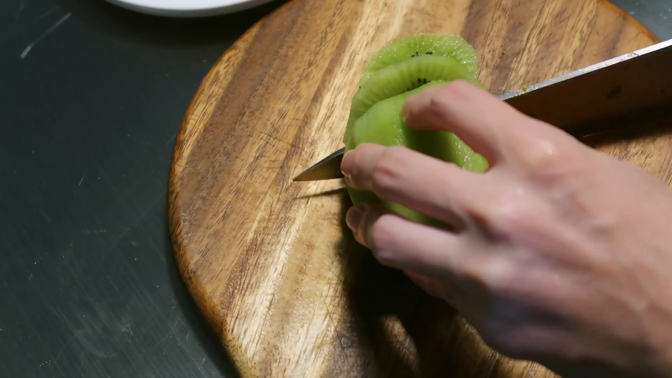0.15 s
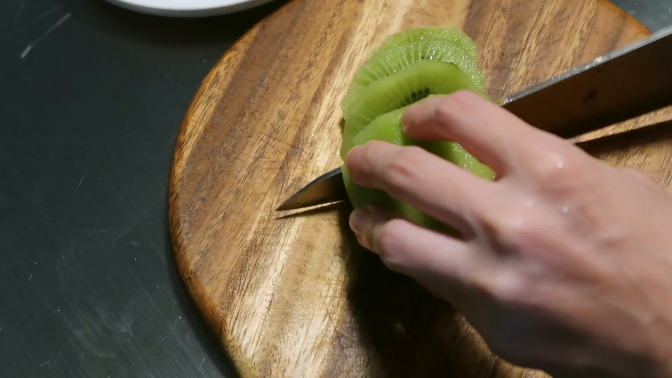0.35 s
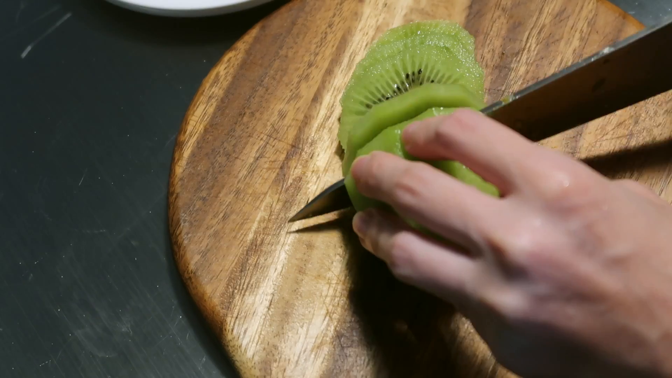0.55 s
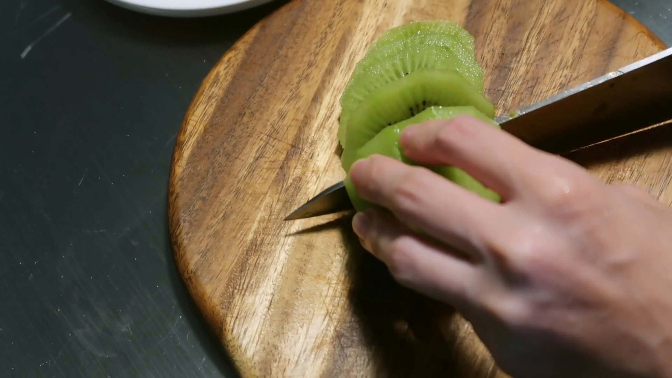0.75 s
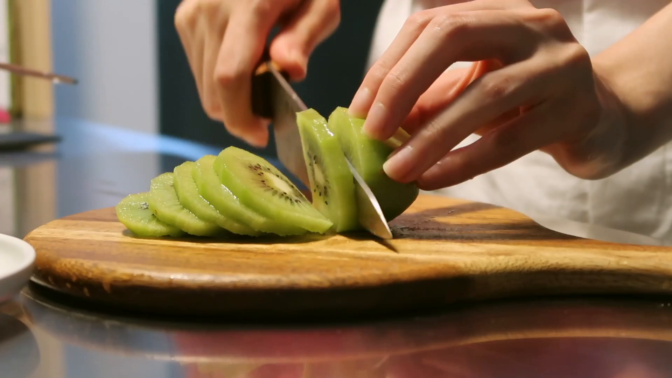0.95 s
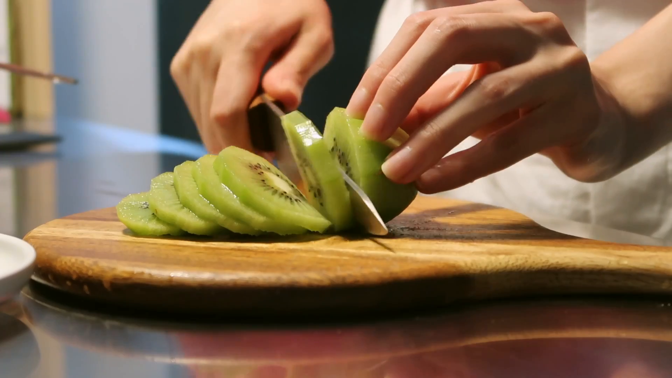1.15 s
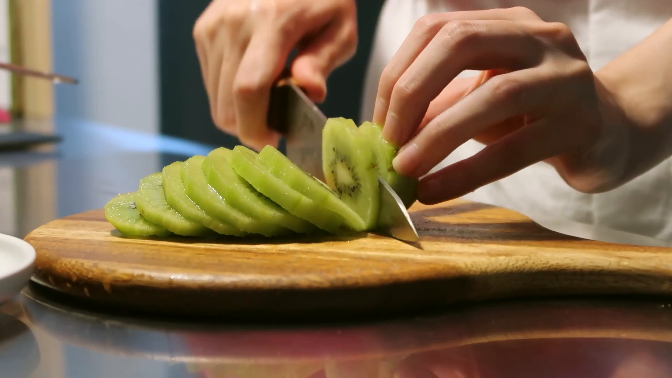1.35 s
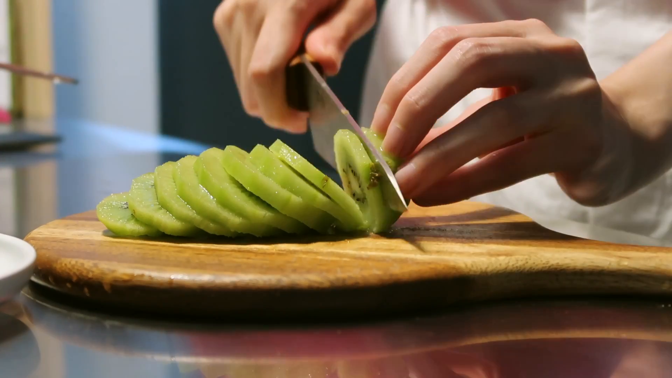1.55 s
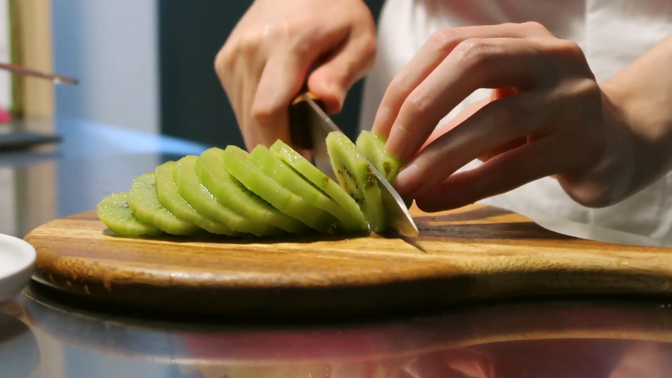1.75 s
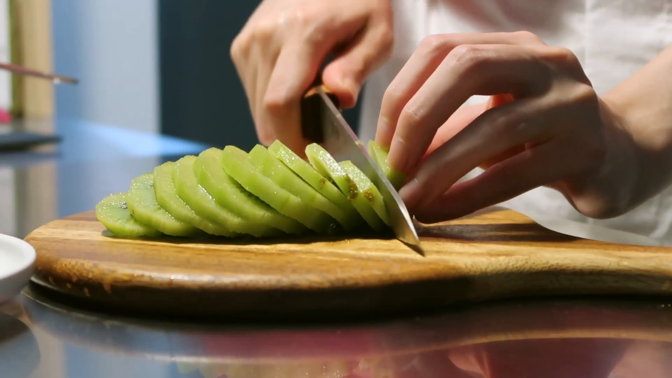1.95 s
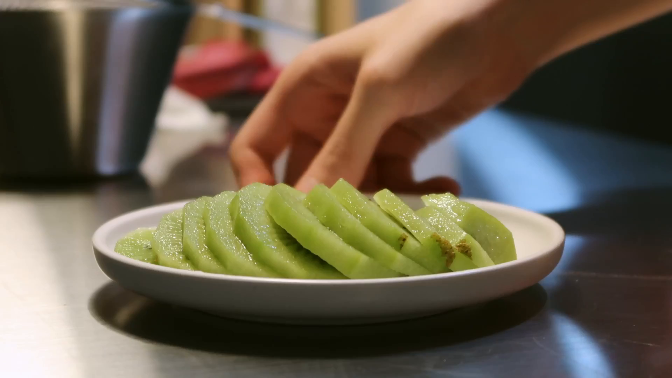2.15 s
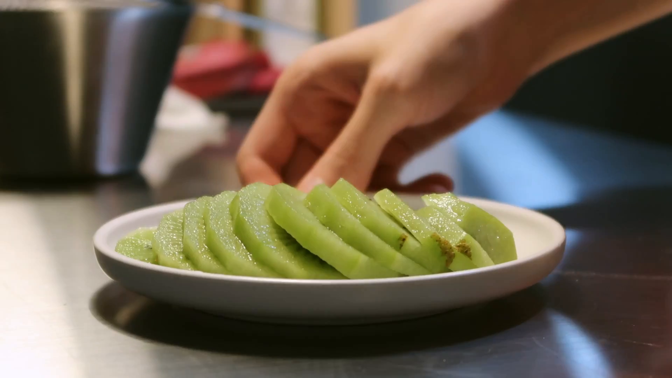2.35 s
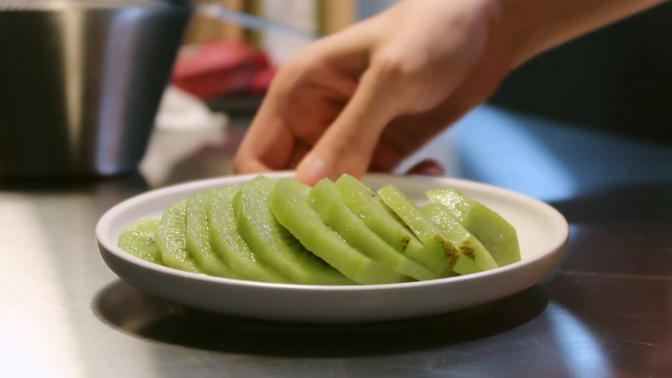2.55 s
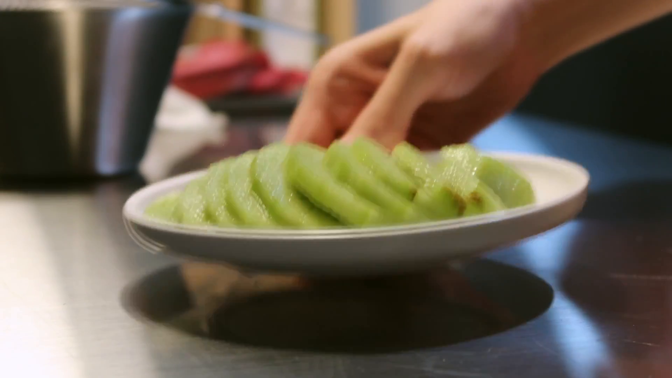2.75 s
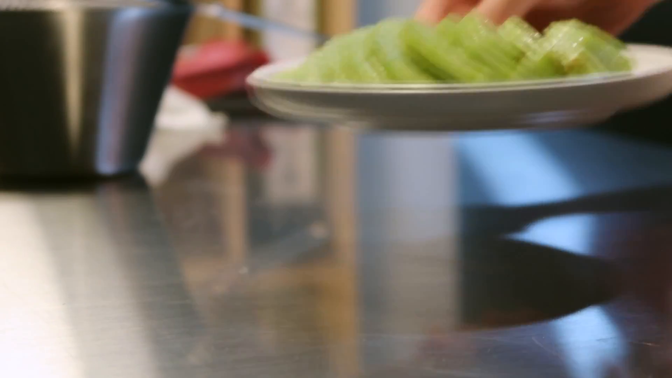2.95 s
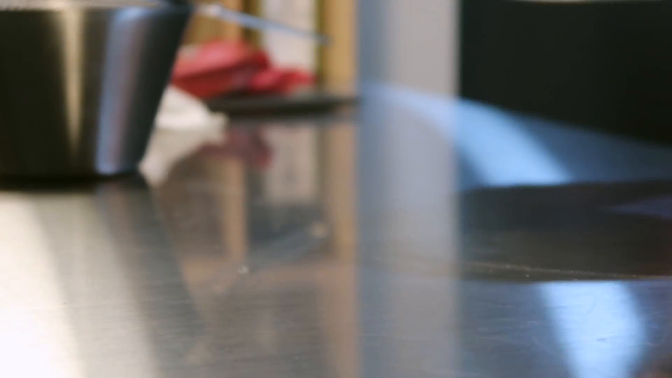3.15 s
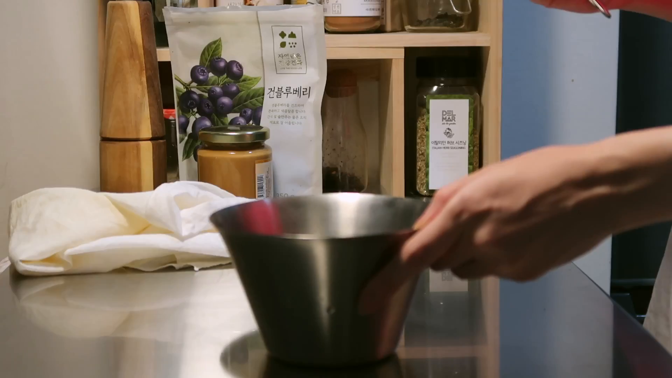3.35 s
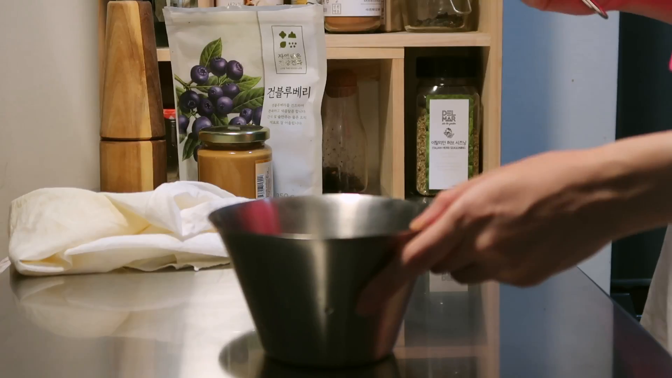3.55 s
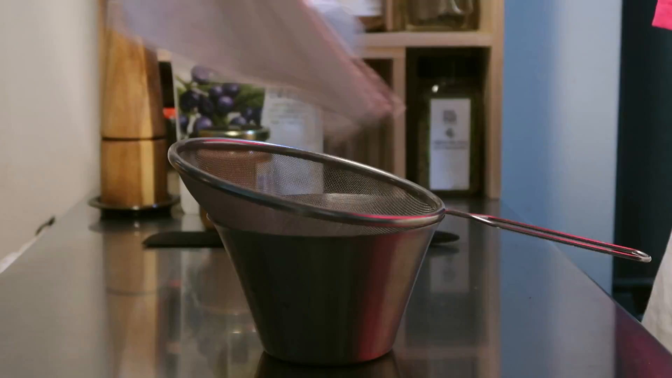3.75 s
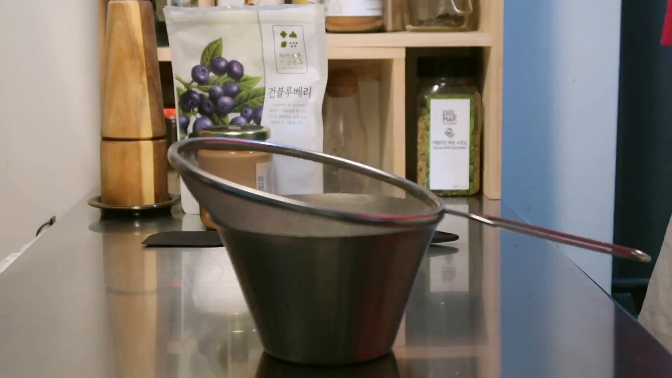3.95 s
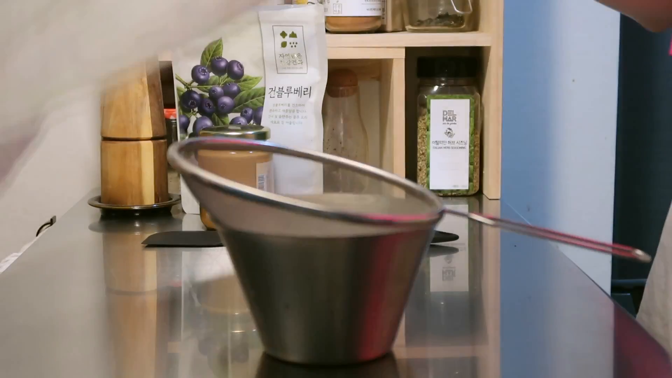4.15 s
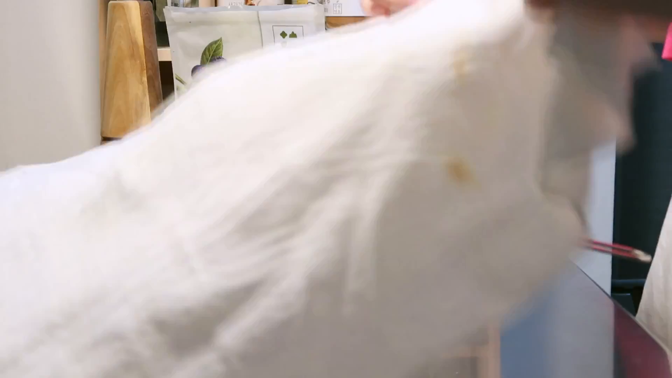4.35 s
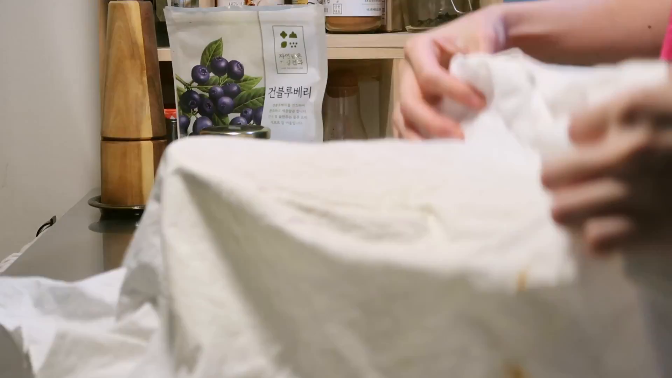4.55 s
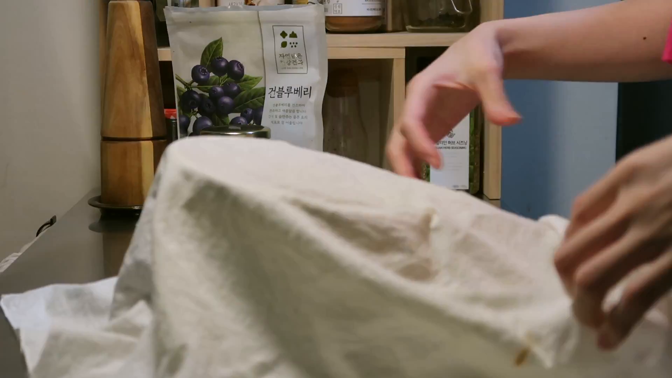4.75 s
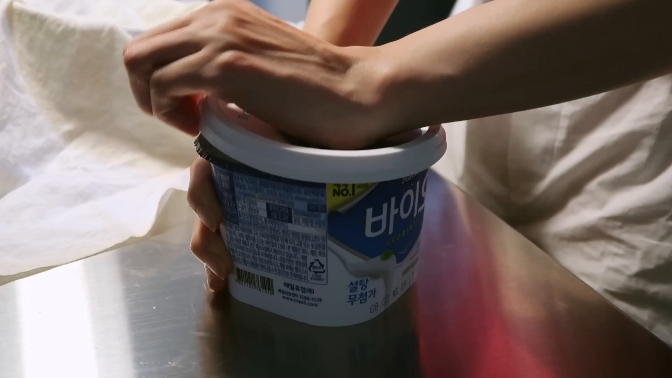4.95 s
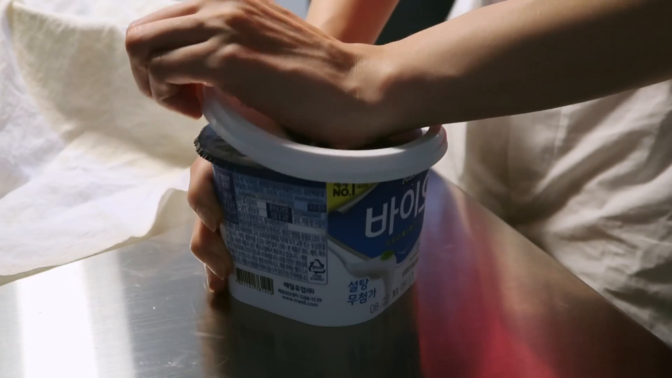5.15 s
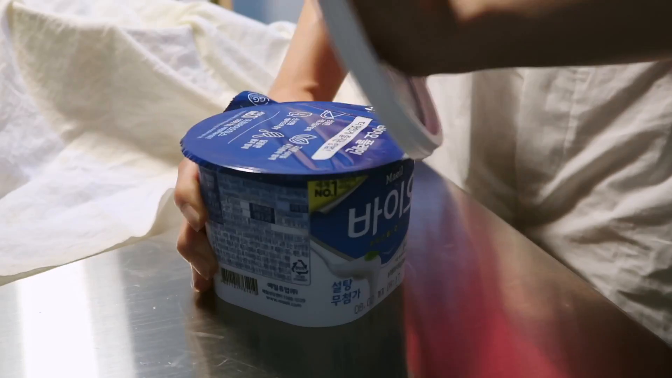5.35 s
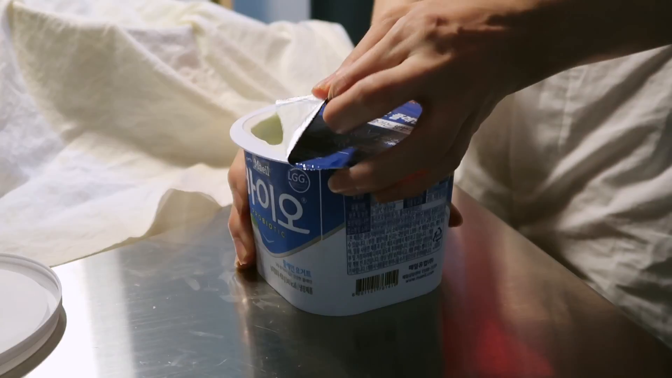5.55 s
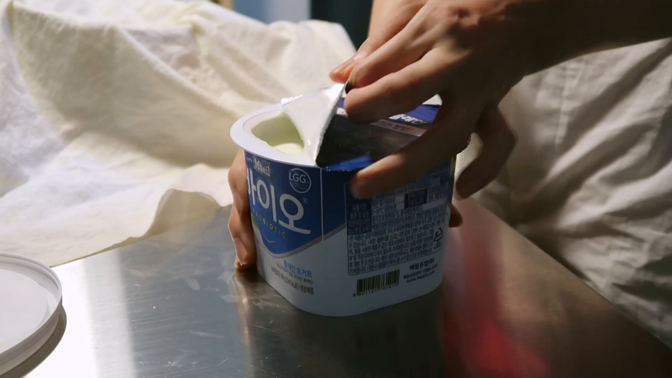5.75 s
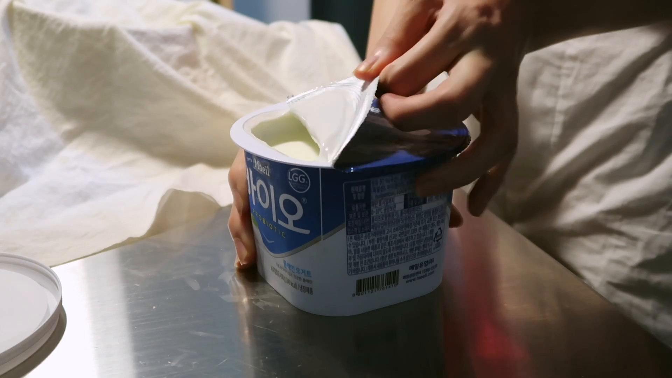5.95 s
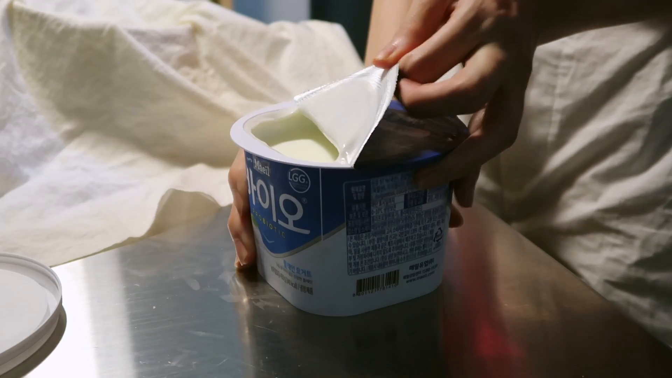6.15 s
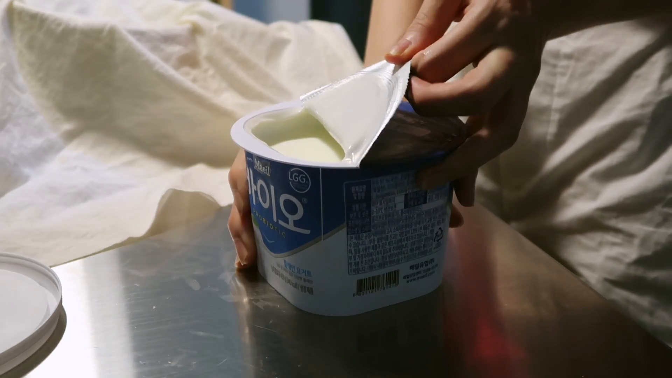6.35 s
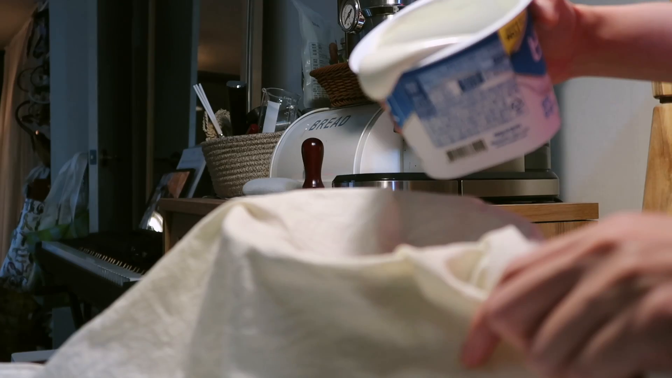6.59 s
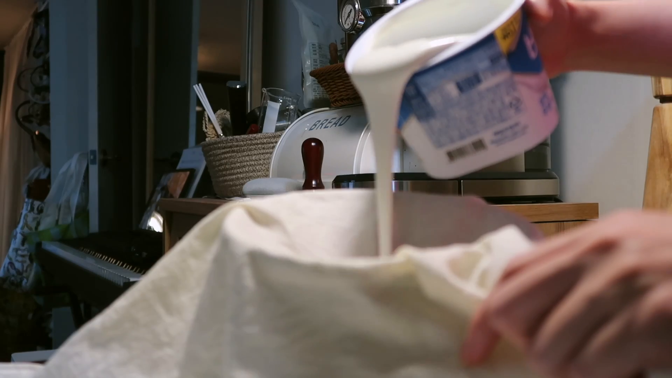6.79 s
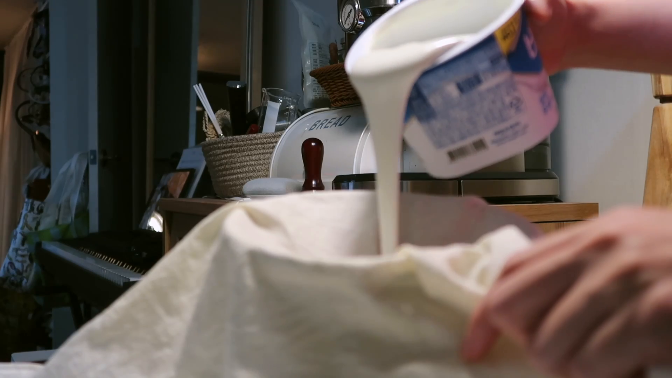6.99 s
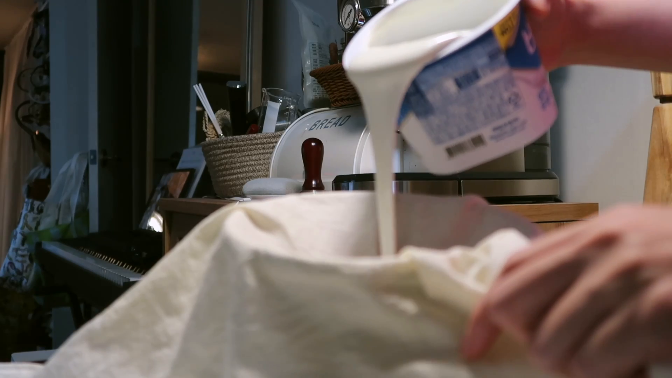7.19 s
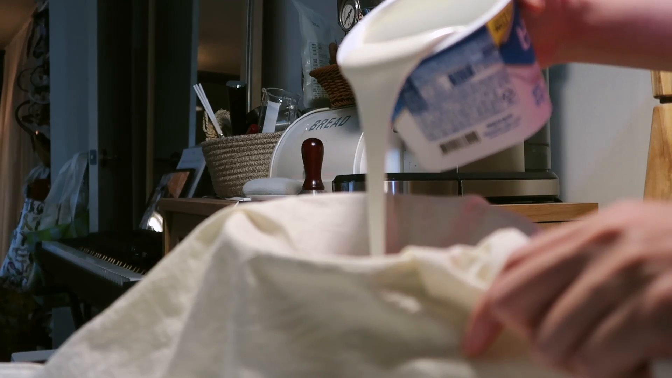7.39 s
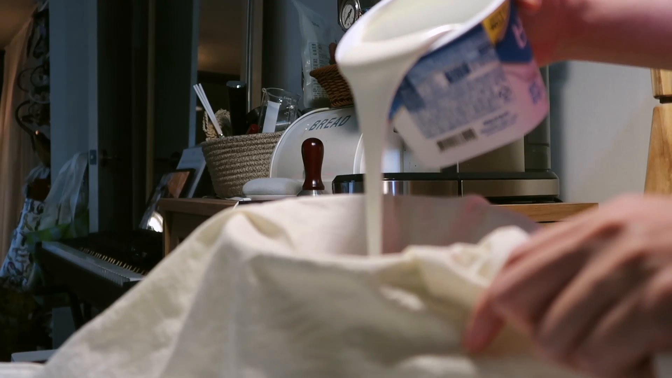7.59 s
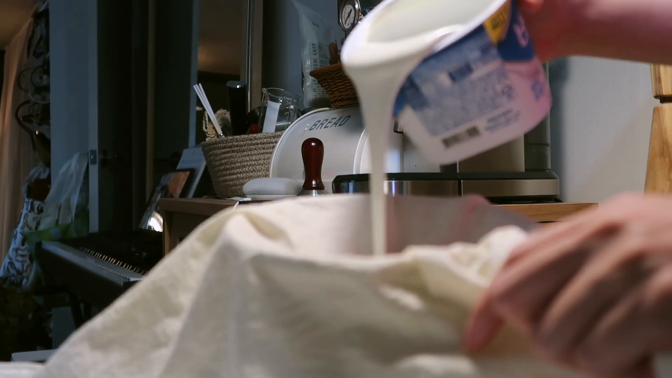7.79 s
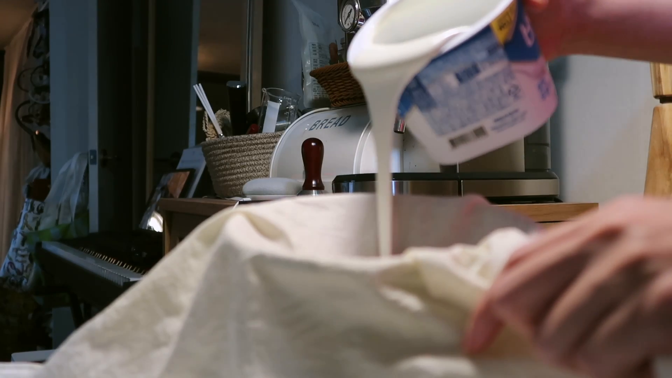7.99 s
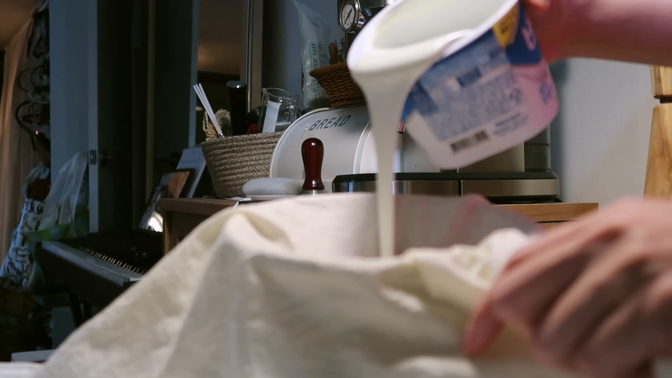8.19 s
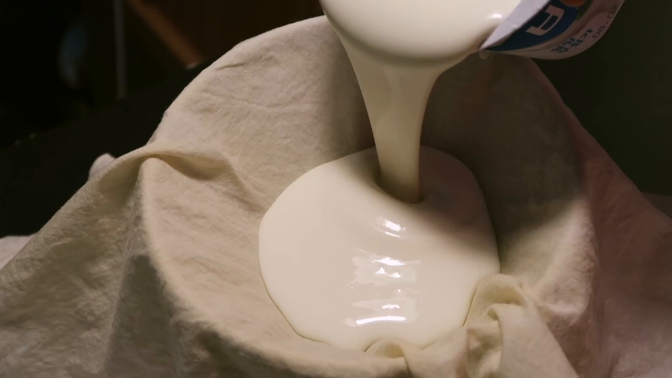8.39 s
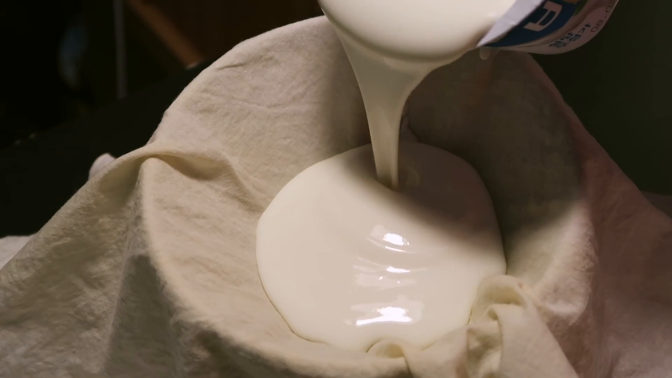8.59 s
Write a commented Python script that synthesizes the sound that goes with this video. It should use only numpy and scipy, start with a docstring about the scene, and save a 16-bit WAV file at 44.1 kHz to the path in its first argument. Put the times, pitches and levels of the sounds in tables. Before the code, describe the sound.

Close kitchen handling: seven wet cuts onto wood, a faint plate knock, a metal bowl landing, tub lid popping, foil seal peeling, then only hum-free room tone.

```python
"""A knife slices a kiwi and knocks on a wooden board, close to the microphone in a small, quiet kitchen.
Then a plate knocks and drags, a steel bowl lands, a plastic lid snaps off a tub and its foil seal peels in jerks.
Contacts are coloured clicks with ringing modes; fizz, drags and crackle are shaped noise, all with echoes.
Filtered noise makes the room air and appliance hums; the handling stops dead at 6.47 s and another air follows."""
import sys
import numpy as np
from scipy import signal
from scipy.fft import rfft, irfft, next_fast_len
from scipy.io import wavfile

SR = 44100
rng = np.random.default_rng(int(sys.argv[2]) if len(sys.argv) > 2 else 0)


def generate_wav(signal):
    """Clip the signal to [-1, 1] and save it as 16-bit WAV at the path in sys.argv[1]."""
    frames = np.transpose(np.atleast_2d(signal))
    scaled = np.clip(frames, -1, 1) * 32767
    pcm = np.round(scaled).astype(np.int16)
    wavfile.write(sys.argv[1], SR, pcm)


N = 380627
TIME = np.arange(N) / SR
TAPS = 20000  # length of one struck sound or room response, in samples
AGE = np.arange(TAPS) / SR  # seconds since the blow

# knife strokes through the fruit onto the board:
# knock_s, strength_db, treble_db, tip_share (0-1 of the blow), stroke_length_s (before the knock)
KNIFE_CUTS = [(0.0518, 6.5, -3.5, 0.99, 0.047), (0.4048, 4, -6, 0.86, 0.15), (.6870, -2, -6.5, 0.97, 0.12),
              (1.0580, 6.5, -0.5, 0.17, 0.17), (1.4150, 3.5, -3, 0.15, 0.22),
              (1.7178, 13, 1.5, 0.16, 0.079), (1.9540, 12, 3, 0.01, 0.08)]
# the hand pulls at the foil seal: start_s, end_s, level_db
SEAL_PULLS = [(5.465, 5.5, -46), (5.63, 5.72, -34), (5.74, 5.835, -33), (5.895, 5.935, -32.5),
              (5.99, 6.14, -40), (6.21, 6.24, -42), (6.43, 6.47, -42)]
# thin foil beams its treble at the wall, so the echo is bright: frequency_hz, gain_db
FOIL_WALL_BEAM = [(3000, 1), (6000, 9.5), (9000, 9), (14000, -1)]


def amp(db):
    """Decibels to gain."""
    return 10 ** (np.asarray(db) / 20)


def unit(x):
    """Scales to energy 1."""
    return x / (np.linalg.norm(x) + 1e-20)


def steady(x):
    """Scales to rms 1."""
    return unit(x) * np.sqrt(len(x))


def read(points, hz):
    """Reads a table on a log-frequency axis."""
    table_hz, value = np.transpose(points)
    return np.interp(np.log(hz + 1), np.log(table_hz + 1), value)


def tint(x, points):
    """Filters by a spectrum in dB."""
    size = next_fast_len(len(x) + 1024)
    gain = amp(read(points, np.fft.rfftfreq(size, 1 / SR)))
    return irfft(rfft(x, size) * gain, size)[:len(x)]


def level(curve):
    """Gain over time from rows (s, dB)."""
    return amp(np.interp(TIME, *np.transpose(curve)))


def held(rows, attack_s, release_s):
    """Gain over time from rows (start s, end s, dB): attack, hold, release."""
    total = 0
    for start, end, db in rows:
        attack = np.clip((TIME - start) / attack_s, 0, 1)
        release = np.clip(1 - (TIME - end) / release_s, 0, 1)
        total = total + amp(db) * attack * release
    return total


def strokes(rows):
    """Pressure of sliding contacts: it builds up from a faint floor, then lets go."""
    total = 0
    for start, end, db in rows:
        corners_s = [start, start + 0.0086, end, end + 0.0067]
        total = total + amp(db) * np.interp(TIME, corners_s, [0.014, 0.14, 0.82, 0])
    return total


def stereo(mid, side):
    """Left and right from mid and side."""
    return np.array([mid + side, mid - side])


def add(mix, s, sound):
    """Lays a sound into the mix at time s."""
    part = mix[:, max(round(s * SR), 0):][:, :sound.shape[-1]]
    part += sound[..., :part.shape[1]]


def click(colour, treble_db=0, spread_s=0):
    """A causal pulse of this colour, tilted about 2 kHz; in thin sheets the treble runs ahead by spread_s."""
    hz = np.fft.rfftfreq(2048, 1 / SR)
    tilt_db = treble_db * np.tanh(np.log((hz + 1) / 2000))
    log_gain = np.log(amp(read(colour, hz) + tilt_db))
    # minimum phase: the energy comes as early as this spectrum allows
    mirrored = np.r_[log_gain, log_gain[-2:0:-1]]
    spectrum = np.exp(np.conj(signal.hilbert(mirrored)))[:len(hz)]
    # the delay of each frequency, summed up into phase in turns
    turns = np.cumsum(abs(spread_s) * np.exp(-hz / 5000)) * hz[1]
    pulse = irfft(spectrum * np.exp(-2j * np.pi * turns))[:1024]
    return unit(np.pad(pulse, (0, TAPS - 1024)))


def ring(modes):
    """Struck modes swell over about a cycle and die away; each swings towards or away from the microphone."""
    total = 0
    for hz, db, t60 in modes:
        decay = rng.choice([-1, 1]) * amp(db - 60 * AGE / t60)
        swell = 1 - np.exp(-(2 * hz * AGE) ** 2)
        total = total + decay * swell * np.sin(2 * np.pi * hz * AGE)
    return unit(total)


def grains(per_s, spread_db):
    """Random tiny ruptures of very unequal size, rms 1."""
    hits = (rng.random(N) < per_s / SR) * rng.choice([-1, 1], N)
    return steady(hits * amp(spread_db * np.minimum(rng.exponential(1, N), 3)))


def scatter(near_db, near_t60, room_db):
    """Dense echoes: a quick flurry from the object and counter, then the room's tail."""
    # decay of the room: frequency_hz, t60_s
    room_decay = [(100, 0.356), (400, 0.45), (1000, 0.28), (2700, 0.26), (6000, 0.27), (15000, 0.18)]
    hz, t, bands = signal.stft(rng.standard_normal(TAPS), SR, nperseg=256)
    bands = bands * amp(-60 * t / read(room_decay, hz)[:, None])
    tail = signal.istft(bands, SR, nperseg=256)[1][:TAPS]
    tail = unit(tail * (1 - np.exp(-AGE / 0.0019)))
    flurry = rng.standard_normal(TAPS) * amp(-60 * AGE / near_t60)
    flurry = unit(flurry * (1 - np.exp(-AGE / 0.0017)))
    return amp(near_db) * flurry + amp(room_db) * tail


def in_room(x, near_db, near_t60, room_db, wall_db=-14, beam=None, wall_s=.0094):
    """Direct sound, one wall echo coloured by the source's beam, and scatter; mostly the treble spreads sideways."""
    # width of the scatter: frequency_hz, side_db
    scatter_width = [(100, -26), (500, -35.5), (2000, -30), (3500, -10), (5500, -3.5), (9000, 3),
                     (14000, -2.5)]
    mid = scatter(near_db, near_t60, room_db)
    mid[0] += 1  # direct sound
    echo = np.zeros(TAPS)
    echo[round(wall_s * SR)] = amp(wall_db)
    mid += tint(echo, beam) if beam else echo
    side = tint(scatter(near_db, near_t60, room_db), scatter_width)
    return signal.oaconvolve(x[None], stereo(mid, side), axes=1)[:, :len(x)]


def air(colour, curve):
    """Steady ventilation noise, nearly mono in the lowest bass and wide from the low mids up."""
    # width of the air: frequency_hz, side_db
    air_spread = [(60, -21.5), (150, -5), (380, 0.5), (950, -3.5), (2380, -1), (5980, -0.5), (15000, 2)]
    mid, side = (steady(tint(rng.standard_normal(N), colour)) for _ in range(2))
    return level(curve) * stereo(mid, tint(side, air_spread))


def hums():
    """Narrow, wavering tones of appliances: noise through a sharp resonance."""
    # hum and whine: start_s, end_s, pitch_hz, width_hz, level_db
    appliance_tones = [(0, 6.47, 119, 5, -61), (3.22, 4.99, 1954, 14, -69.5), (0, 8.63, 13001, 12, -86)]
    size = next_fast_len(N)
    bin_hz, out = np.fft.rfftfreq(size, 1 / SR), np.zeros(N)
    noise = rfft(rng.standard_normal(size))
    for start, end, hz, width, db in appliance_tones:
        tone = steady(irfft(noise / (1 + ((bin_hz - hz) / width) ** 4), size)[:N])
        out += amp(db) * tone * (TIME > start) * (TIME < end)
    return out


def slicing(stroke_db=-52.5, db_per_knock_db=.52):
    """Wet cells burst under the blade, louder as the stroke deepens; firm strokes end in harder knocks."""
    # colour of the bursting flesh: frequency_hz, level_db
    flesh_colour = [(60, 8), (200, 11.5), (500, -2), (1500, -5), (2600, -1), (3600, -13), (5000, -12),
                    (8000, -22.5), (14000, -22.5), (16000, -39)]
    rows = [(s - length, s, stroke_db + db_per_knock_db * db) for s, db, _, _, length in KNIFE_CUTS]
    bursts = steady(tint(grains(per_s=3000, spread_db=3), flesh_colour))
    return in_room(strokes(rows) * bursts, near_db=4.0, near_t60=0.031, room_db=-3.5)


def knife(tip_db=-3, tip_ring_db=-3, board_db=-6.5, board_ring_db=0):
    """The blade breaks through: its tip rings on the wood, its full edge knocks the whole board."""
    # colours of the tip's and the edge's contact: frequency_hz, level_db
    tip_colour = [(40, -33), (130, -17.5), (280, 5), (450, -7.5), (700, -1), (1100, 1.5), (1500, -16.5),
                  (2000, 0), (2400, 3), (3300, -15.5), (5000, -20), (7500, -38.5), (16000, -47)]
    edge_colour = [(40, -36), (140, -8), (300, -12), (550, 4.5), (1000, 3.5), (1600, -1), (2400, -5),
                   (3200, -10), (3900, -20), (5500, -26), (8500, -39.5), (16000, -49)]
    # ringing under the tip and of the whole board: pitch_hz, level_db, t60_s
    tip_ringing = [(151, -8.5, 0.175), (229, -4, .16), (267.4, -2.5, 0.16), (350, -3, 0.3), (605, 2, 0.13),
                   (703, -3.5, 0.2), (822, -13, .2), (896, -10, 0.26), (1069, -5, 0.2), (1196, -4, .12),
                   (2310, -15, 0.064), (2300, 11.5, 0.016), (2300, -24, 0.052), (2710, -24, .2),
                   (2850, -12.5, 0.32)]
    board_ringing = [(149.4, -12, 0.27), (234.5, -13.5, 0.28), (298, -11.5, 0.32), (396.5, -6, 0.15),
                     (437, -1, 0.077), (495, -2.5, 0.11), (551.3, -3, 0.12), (600, 4, 0.072),
                     (703, 3, 0.095), (840, -14.5, 0.36), (920, -18, 0.16), (1069, -3.5, 0.14),
                     (1190, -9, 0.19), (1447, -3, 0.1), (1565, -10.5, 0.077), (1900, -9, 0.17),
                     (2010, -4.5, 0.084), (2370, -6, 0.079), (2780, -8.5, 0.084), (3220, -9.5, 0.056),
                     (3630, -37, 0.19)]
    ring_stop_s = 1.829  # knocks before this moment stop ringing here
    out = np.zeros((2, N))
    tip_click = click(tip_colour, spread_s=0.001848)
    tip = amp(tip_db) * in_room(tip_click, near_db=1.5, near_t60=0.026, room_db=-3)
    tip = tip + amp(tip_ring_db) * ring(tip_ringing)
    edge_click = click(edge_colour, spread_s=0.00055)
    edge = amp(board_db) * in_room(edge_click, near_db=0, near_t60=0.08, room_db=1.5)
    edge = edge + amp(board_ring_db) * ring(board_ringing)
    for s, db, treble_db, tip_share, _ in KNIFE_CUTS:
        blow = tip_share * tip + (1 - tip_share) * edge
        knock = np.array([tint(ear, [(500, 0), (4000, treble_db)]) for ear in blow])
        audible = (s + AGE < ring_stop_s) | (s > ring_stop_s)
        add(out, s, amp(db) * knock * audible)
    return out


def plate(ring_db=-4):
    """The plate knocks as it is lifted, and its foot drags softly on the counter as rubbing noise."""
    # colour of the contact: frequency_hz, level_db
    foot_colour = [(50, -43.5), (270, 7), (550, 0.5), (1300, 1), (2600, -6), (4000, -29), (16000, -49)]
    # ringing of the plate: pitch_hz, level_db, t60_s
    plate_ringing = [(269, 5, .16), (548, 2, .1), (803, -9, 0.11), (1310, -1, .12), (1630, -1, 0.1)]
    # bumps: knock_s, strength_db
    bumps = [(2.145, -24), (2.4243, -17), (2.443, -20)]
    # drags of the foot: start_s, end_s, level_db
    foot_drags = [(2.415, 2.452, -57), (2.64, 2.68, -46.5)]
    drag = strokes(foot_drags) * steady(tint(rng.standard_normal(N), foot_colour))
    out = in_room(drag, near_db=-25.0, near_t60=0.071, room_db=-3.5)
    body = amp(ring_db) * ring(plate_ringing)
    for s, db in bumps:
        bump = in_room(click(foot_colour), near_db=1, near_t60=0.064, room_db=-6)
        add(out, s, amp(db) * (bump + body))
    return out


def ticking(per_s=30, jitter=0.45):
    """A faint, uneven, high ticking in the background: short rings at irregular moments."""
    # pitches of the ticks: pitch_hz, level_db, t60_s
    tick_ringing = [(3780, 2.5, 0.016), (4640, -1, .012), (4910, -5.5, 0.02)]
    # when the ticking is heard: start_s, end_s, level_db
    tick_spells = [(2.17, 2.72, -69.5), (3.1, 3.25, -65.5), (3.4, 4.97, -71.5), (7.6, 8.63, -72.5)]
    times = np.cumsum(abs(1 + jitter * rng.standard_normal(400))) / per_s
    sizes = amp(2.8 * rng.standard_normal(400))
    train = np.bincount((times * SR).astype(int), sizes, N)[:N]
    ticks = steady(signal.oaconvolve(train, ring(tick_ringing))[:N])
    ticks = ticks * held(tick_spells, attack_s=0.027, release_s=0.03)
    return in_room(ticks, near_db=-15, near_t60=.02, room_db=-8.0)


def bowl(s=3.3942, blow_db=7, ring_db=12):
    """A hand-damped steel bowl lands on the steel counter: one blow and its short ringing."""
    # colour of the contact: frequency_hz, level_db
    bowl_colour = [(40, -28), (130, -10), (330, -2), (1000, 0), (1600, -1), (2400, -6.5), (3300, -9),
                   (4400, -24), (5500, -21), (7500, -35), (16000, -54)]
    # ringing of the bowl: pitch_hz, level_db, t60_s
    bowl_ringing = [(133, -19, 0.29), (201, -15.5, 0.22), (313.6, -7, 0.27), (376, -14, 0.48),
                    (478, -4, 0.12), (555, -5.5, 0.35), (599, 2, 0.12), (697, -15, 0.25), (939, -1, 0.24),
                    (1017, 6, 0.1), (1290, -4, 0.18), (1500, -6, 0.11), (1610, 4.5, 0.12), (2215, -10, .25),
                    (2750, -30, 0.29), (3000, -12, 0.23), (3120, -1.5, .13), (3400, -19, 0.27),
                    (5100, -11, 0.099), (5884, -18, 0.14)]
    out = np.zeros((2, N))
    blow = in_room(click(bowl_colour), near_db=-1, near_t60=0.15, room_db=0.5)
    add(out, s, amp(blow_db) * blow + amp(ring_db) * ring(bowl_ringing))
    return out


def lid(tight_ring_db=-11, loose_ring_db=-6.0, tight_thump_db=-12, loose_thump_db=-6.0,
        thump_per_treble=0.97):
    """Rim snaps ring the plastic and thump the hollow tub; dull snaps thump more, a loose lid frees both."""
    # colour of a snap: frequency_hz, level_db
    rim_colour = [(50, -36.5), (160, -18.5), (320, -5), (900, -9), (1700, 0), (2800, 0.5), (3800, -6.5),
                  (5000, -12.5), (7500, -22), (13000, -28.5), (16000, -43.5)]
    # ringing of the tub and of the lid: pitch_hz, level_db, t60_s
    tub_ringing = [(279.7, -13, 0.25), (348, 1.5, 0.15), (408, -2.5, 0.16), (470, 1, 0.1), (568, -1, 0.15),
                   (619, -1.5, 0.0703)]
    lid_ringing = [(1750, 4, .09), (2240, 0.5, .1), (2490, 2, 0.142), (2660, -6, .16), (2740, -15, 0.24),
                   (2660, 1.5, 0.29), (3000, -5.5, 0.12)]
    # the rim slips over the lip: snap_s, strength_db, treble_db
    rim_snaps = [(4.9920, 4.5, -5.5), (5.008, -6, -1), (5.0211, 5, 2), (5.1438, -19, 9),
                 (5.151, -21, -20.5), (5.2158, -16.5, 30.5), (5.2361, -2, -13), (5.2587, -9.5, 11),
                 (5.2738, -3, -6.5), (5.2828, 13, 0.5), (5.2923, 6.5, -1)]
    loose_s = 5.1  # from here on the lid no longer damps the tub
    out, tub, plastic = np.zeros((2, N)), ring(tub_ringing), ring(lid_ringing)
    for s, db, treble_db in rim_snaps:
        rim_click = click(rim_colour, treble_db, spread_s=0.00201)
        snap = in_room(rim_click, near_db=-1.5, near_t60=0.017, room_db=-3.5, wall_db=-7)
        tight = s < loose_s
        ring_db = tight_ring_db if tight else loose_ring_db
        thump_db = (tight_thump_db if tight else loose_thump_db) - thump_per_treble * treble_db
        add(out, s, amp(db) * (snap + amp(ring_db) * plastic + amp(thump_db) * tub))
    return out


def wrinkles(pull, count=30, over_pull_db=24, spread_db=2):
    """Small buckles at uneven moments, about as strong as the pull: rows (s, dB)."""
    place, size = rng.random(count), rng.standard_normal(count)
    first_s, last_s = SEAL_PULLS[0][0], SEAL_PULLS[-1][1]
    times = first_s + (last_s - first_s) * (np.arange(count) + place) / count
    pull_db = 20 * np.log10(np.interp(times, TIME, pull) + 1e-9)
    return list(zip(times, pull_db + over_pull_db + spread_db * size))


def foil(crack_db=-6.5, sheet_db=-2.5, cavity_db=-3, air_t60=0.055,
         tub_wall_hz=275, tub_wall_db=-15, tub_wall_t60=0.2):
    """Pulls crackle and buckle the foil; buckles ring the sheet and the tub's air, whose note climbs as it opens."""
    # colours of a buckle and of the crackle: frequency_hz, level_db
    buckle_colour = [(50, -25), (150, -6), (280, -9), (520, -3), (900, 0.5), (1500, -3), (2000, 0),
                     (2500, 0), (3400, -5.5), (4600, -9), (6500, -14.5), (9000, -20.5), (13500, -19.5),
                     (16000, -26)]
    crackle_colour = [(50, -32), (280, -2.5), (900, -2), (1800, 6), (2800, 6), (4800, -0.5), (6500, -4.5),
                      (9000, -9), (13500, -15), (16000, -54)]
    # ringing of the sheet: pitch_hz, level_db, t60_s
    sheet_ringing = [(1537, -9, .05), (1835, -15, 0.045), (2280, -0.5, 0.075), (2440, 0, 0.081),
                     (3270, 6, 0.029), (3550, -1.5, 0.038)]
    # loud buckles: buckle_s, strength_db
    loud_buckles = [(5.4690, -10.5), (5.5016, 5.5), (5.5500, -2), (5.572, -8.5), (5.6572, -4), (5.694, 3),
                    (5.7181, 2), (5.752, -7), (5.7881, -2), (5.7960, -0.5), (5.8223, -1.5), (5.906, -1),
                    (5.9211, 0.5), (6.024, 3.5), (6.1454, 5), (6.1876, 0.5), (6.229, 1.5), (6.3574, 3)]
    # the air note climbs steadily from the first loud buckle until the seal is wide open
    air_start_hz, air_rise_hz_per_s, air_open_hz = 809, 390, 1077
    out, pull = np.zeros((2, N)), held(SEAL_PULLS, attack_s=0.017, release_s=0.012)
    for s, db in loud_buckles + wrinkles(pull):
        crack = in_room(click(buckle_colour, spread_s=0.001163), near_db=-3.0, near_t60=0.044,
                        room_db=0.5, wall_db=-13.0, beam=FOIL_WALL_BEAM)
        # the tension of the sheet keeps changing, so its pitches do too
        sheet = ring([(hz * rng.uniform(0.97, 1.04), mode_db, t60) for hz, mode_db, t60 in sheet_ringing])
        air_hz = min(air_start_hz + air_rise_hz_per_s * (s - loud_buckles[0][0]), air_open_hz)
        cavity = ring([(air_hz, 0, air_t60), (tub_wall_hz, tub_wall_db, tub_wall_t60)])
        buckle = amp(crack_db) * crack + amp(sheet_db) * sheet + amp(cavity_db) * cavity
        add(out, s, amp(db) * buckle)
    rupture = click(crackle_colour, treble_db=1.5, spread_s=0.00077)
    crackle = signal.oaconvolve(grains(per_s=300, spread_db=2.0) * pull, rupture)[:N]
    return out + in_room(crackle, near_db=-2.0, near_t60=0.041, room_db=-5.5)


def glue(first_db=-3.0, growth_db_per_s=4):
    """Dry jerks of the glue letting go, a little stronger as the peeled edge gets longer."""
    # colour of a jerk: frequency_hz, level_db
    jerk_colour = [(50, -19), (350, -3.5), (730, -10.5), (950, -1.5), (2200, -2.5), (3050, 4), (3900, -3.5),
                   (4900, -12), (5900, -6), (7800, -20), (12000, -25), (16000, -35)]
    # moments when the glue lets go: jerk_s
    jerk_times = [5.6253, 5.8814, 5.992, 6.0077, 6.0620, 6.079, 6.0904, 6.1100, 6.1306, 6.2143, 6.3386,
                  6.425, 6.4495, 6.4680]
    out = np.zeros((2, N))
    for s in jerk_times:
        jerk = in_room(click(jerk_colour, spread_s=0.001523), near_db=-3.5, near_t60=0.012,
                       room_db=-3.5, wall_db=-11.5, beam=FOIL_WALL_BEAM)
        add(out, s, amp(first_db + growth_db_per_s * (s - jerk_times[0])) * jerk)
    return out


def scene():
    """The handling stops dead and a second room air follows; the low hum ends with the first,
    while a faint 13 kHz whine and spells of ticking are heard over both."""
    # colours of the first and the second room air: frequency_hz, relative_level_db
    first_colour = [(15, -56.5), (25, -10.5), (108, -4.5), (145, -7), (212, -9.5), (249, -9.5), (285, -10),
                    (659, -16.5), (863, -17), (1790, -23.5), (1940, -22), (2110, -24.5), (3720, -28.5),
                    (12500, -44.5), (16000, -54.5)]
    second_colour = [(15, -39), (25, -10), (43, -5), (97, -0.5), (134, -5.5), (249, -6), (301, -6.5),
                     (354, -7.5), (641, -12), (863, -10.5), (1700, -19), (1840, -18.5), (2280, -21),
                     (13200, -42.5), (16000, -77)]
    # levels of the first and the second room air: time_s, level_db
    first_level = [(0, -52.5), (2.1, -51), (2.3, -53.5), (4.9, -53), (6.47, -68)]
    second_level = [(6.472, -51), (8.38, -52), (8.63, -49)]
    handling_end_s = 6.4705
    work = knife() + slicing() + plate() + bowl() + lid() + glue() + foil()
    work = work + air(first_colour, first_level)
    place = np.where(TIME < handling_end_s, work, air(second_colour, second_level))
    return place + hums() + ticking()


def record(dry):
    """Peaks beyond full scale clip; then a steep low-pass at 16.1 kHz limits the band."""
    low_pass = signal.firwin(511, 16100, window=("kaiser", 9), fs=SR)
    return signal.oaconvolve(np.clip(dry, -1, 1), low_pass[None], "same")


dry = scene()
out = record(dry)
generate_wav(out)
```